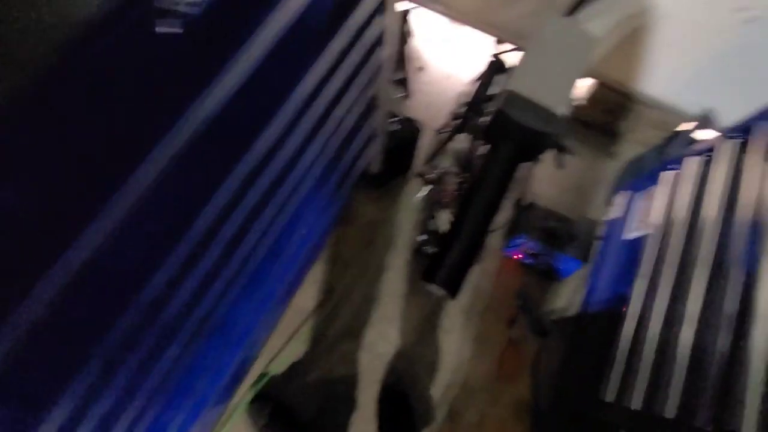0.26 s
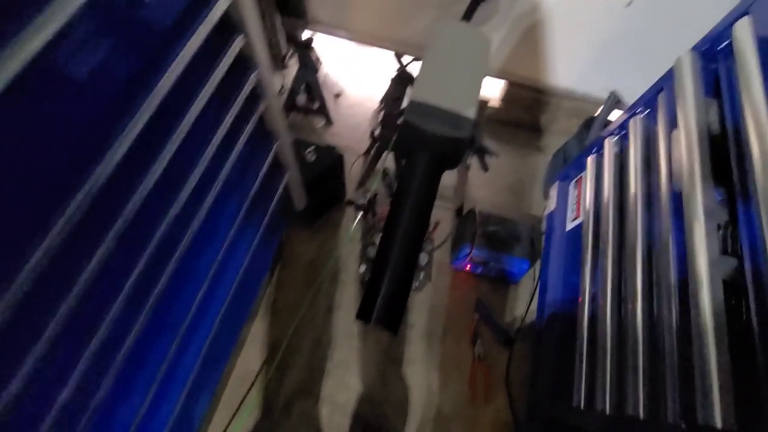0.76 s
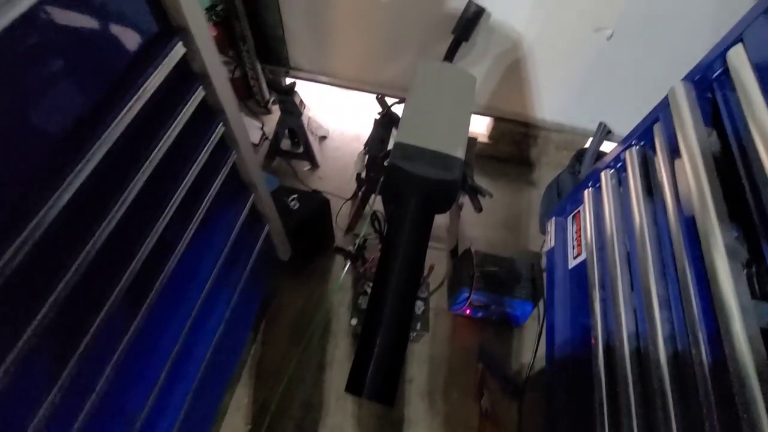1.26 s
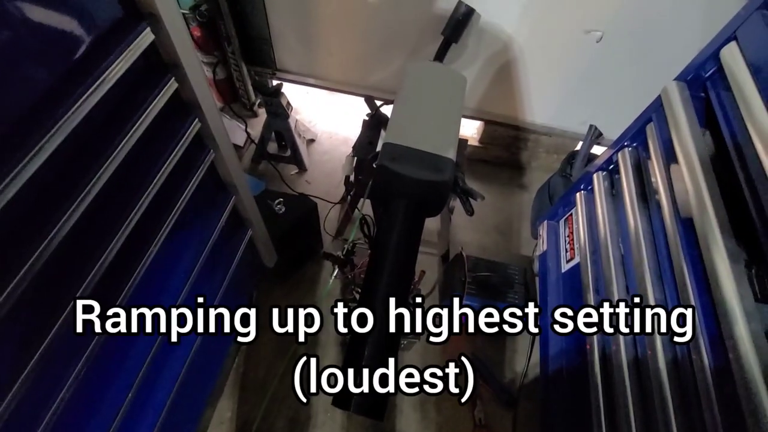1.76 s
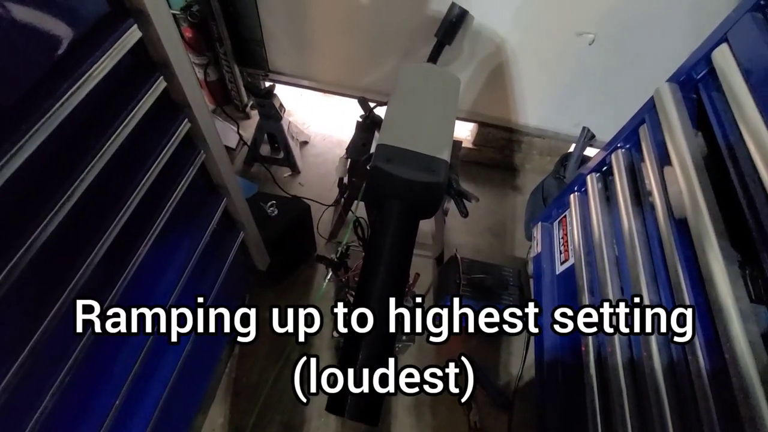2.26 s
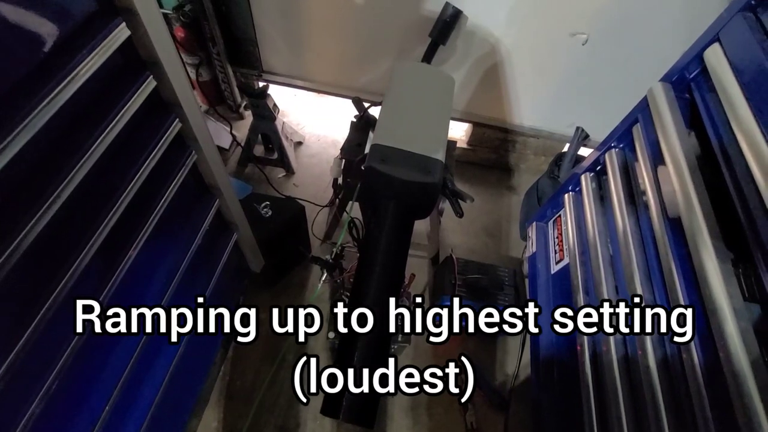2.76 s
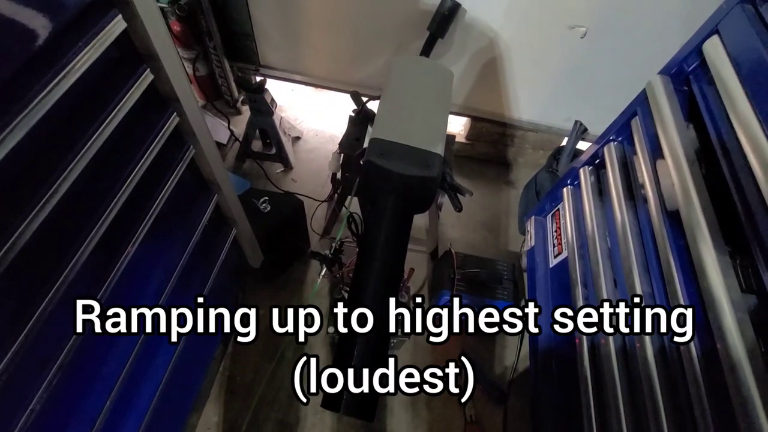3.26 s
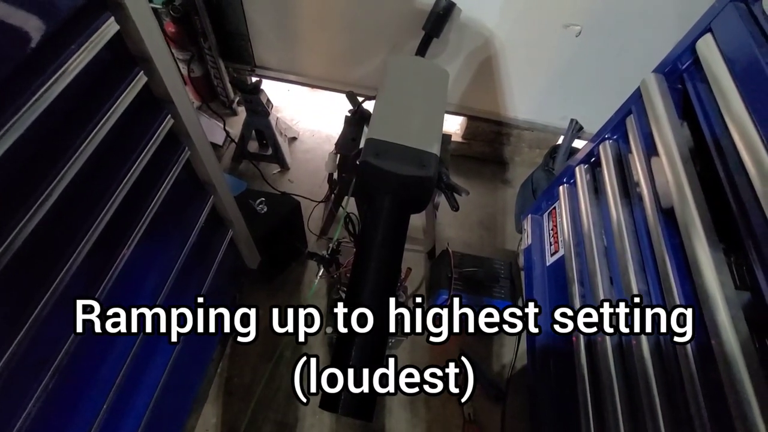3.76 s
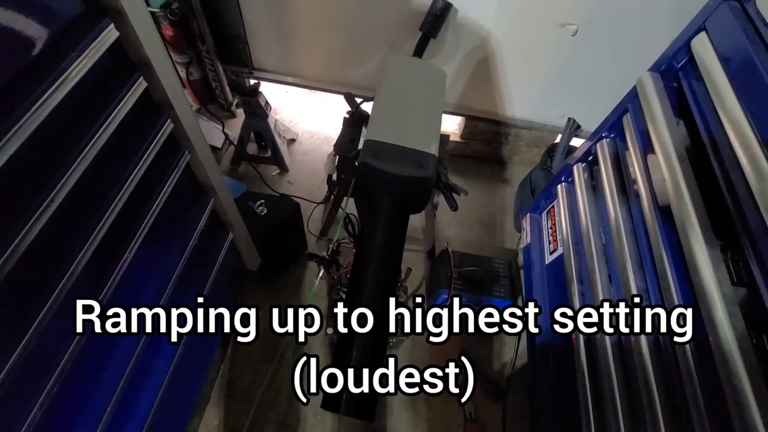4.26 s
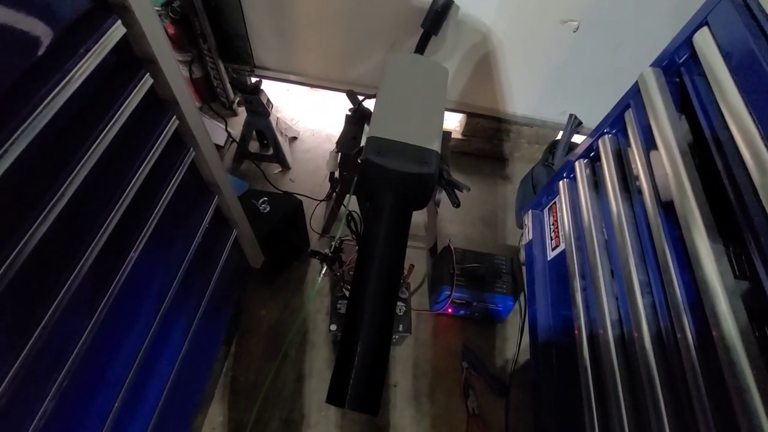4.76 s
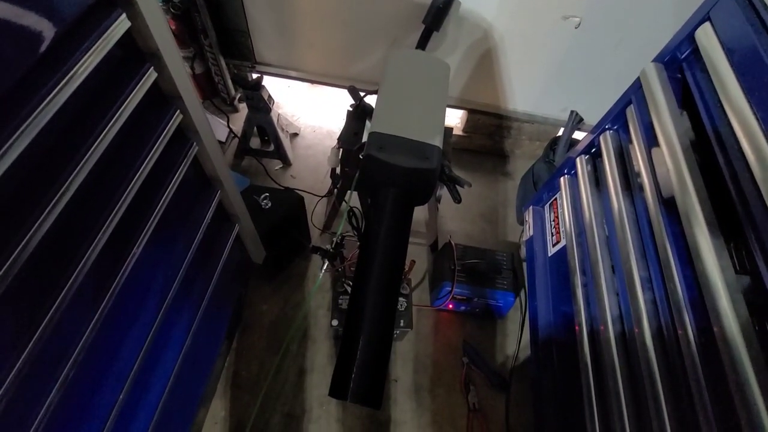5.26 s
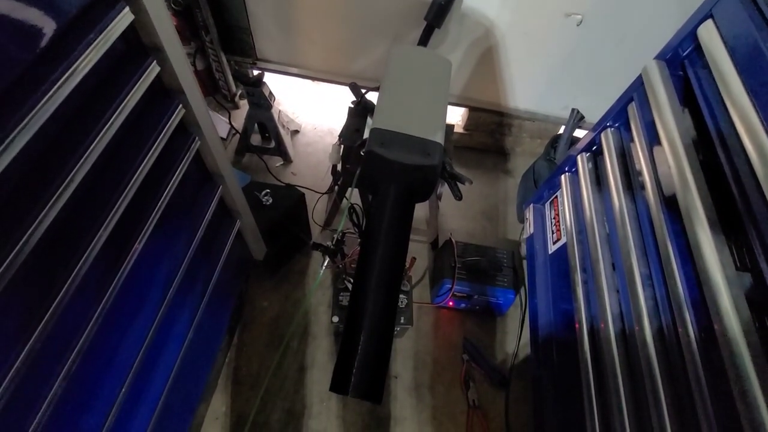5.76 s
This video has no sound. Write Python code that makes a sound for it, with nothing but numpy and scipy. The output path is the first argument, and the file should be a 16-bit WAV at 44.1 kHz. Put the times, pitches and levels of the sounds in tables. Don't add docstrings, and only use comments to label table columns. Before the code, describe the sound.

A diesel air heater is already running in a garage, heard for about six seconds through a handheld stereo camera. Its combustion makes a continuous low, breathy roar, strongest in the bass, with dull pipe resonances and soft air hiss, growing very slightly louder. Over it a wavering, slightly rough blower whine around 900 Hz climbs smoothly by about a semitone, leaning right as the camera settles. At about 0.05 seconds a hard, dry, very close finger snap hits the camera case, with tiny clicks around it and fainter ones near 0.2 and 0.4 to 0.55. Throughout, a fuel pump gives faint, crisp ticks about every 0.35 seconds, each with a softer return tick just after. Around 1 second the turn uncovers a narrow, airy duct whistle near 2.2 kHz. Barely audible cloth brushes pass near 0.5, 1.8 and 2.4; extremely faint, very high electrical whistles enter after 2. The heater continues to the end.

```python
import sys
import numpy as np
from scipy import signal
from scipy.fft import rfft, irfft
from scipy.io import wavfile
from scipy.ndimage import uniform_filter1d

SR = 44100
rng = np.random.default_rng(int(sys.argv[2]) if len(sys.argv) > 2 else 0)


def store_wav(level_fs):
    pcm = np.round(np.clip(np.atleast_2d(level_fs), -1, 1) * 32767)
    wavfile.write(sys.argv[1], SR, pcm.T.astype(np.int16))


def ratio(d):
    e = np.asarray(d, float) / 20
    return 10 ** e


N = 264600
CONTROL = 441


def evened(x):
    return x / np.sqrt(np.mean(x ** 2) + 1e-20)


def read(points, hz):
    f, value = np.transpose(points)
    return np.interp(np.log(hz + 1), np.log(f + 1), value)


def add(mix, s, sound):
    part = mix[:, round(s * SR):][:, :sound.shape[1]]
    part += sound[:, :part.shape[1]]


def coloured(points, shape):
    hz = np.fft.rfftfreq(shape[-1], 1 / SR)
    spectrum = rfft(rng.standard_normal(shape)) * ratio(read(points, hz))
    return evened(irfft(spectrum, shape[-1]))


def drift(per_s, t):
    rates = np.geomspace(.2, per_s, num=24)
    return evened(sum(np.sin(2 * np.pi * (f * t + rng.random())) / np.sqrt(f) for f in rates))


def resonance(hz, centre, width, db):
    return ratio(db) ** 2 / (1 + (2 * (hz - centre) / width) ** 2) ** 2


def roar(patchy_db=1.0, swell_db=.5, ripple_db=2.0, direct=0.48):
    # frequency in Hz, level in dB.
    wash = [(15, -38), (35, -19.5), (75, -4), (140, -14), (300, -13), (500, -17), (620, -23), (1300, -23),
            (1650, -30), (2500, -33), (3600, -42), (5200, -51.5), (8800, -57), (16000, -55.5)]
    # frequency in Hz, width in Hz, height over the wash in dB.
    pipe = [(76.5, 22.4, 9.5), (240.3, 97, 9), (444.5, 79, 9.5), (750, 41, -2.5), (561, 32, 5),
            (1223, 60, 6.5), (1268, 33.4, 14), (1930, 350, 4.5), (2443, 350, 1), (3500, 420, 2),
            (6570, 1800, 9.5), (15300, 900, 8)]
    # frequency in Hz, width in Hz, height over the wash in dB.
    duct = (2225, 57.4, 17.4)
    # frequency in Hz, left-right likeness from -1 to 1.
    likeness = [(60, 0.96), (130, 1), (290, 0.98), (640, 0.88), (1410, -0.011), (3100, -0.16),
                (6820, -0.0031), (15000, -0.39)]
    # frequency in Hz, left over right in dB.
    ear_lean = [(60, -0.5), (110, -1), (200, -0.5), (380, 0), (700, 1.5), (1290, -0.5), (2380, -4),
                (4400, 7), (8120, 1), (15000, 5.5)]
    size, hop = 4096, 1024
    frames = N // hop + 5
    hz = np.fft.rfftfreq(size, 1 / SR)[:, None]
    t = np.arange(frames) * hop / SR
    level_db = -36.5 + 0.2337 * t
    hiss_db = 1 - .5 * t

    hidden_db, open_db, faced_s, turn_s = -12, 0, 1.05, .05
    duct_db = hidden_db + (open_db - hidden_db) * (1 + np.tanh((t - faced_s) / turn_s)) / 2
    duct_db = duct_db + 0.5 * drift(9.9, t)
    modes = sum(resonance(hz, *mode) for mode in pipe)
    lift = np.sqrt(1 + modes + resonance(hz, duct[0], duct[1], duct[2] + duct_db))

    a, b, c, d, patches = rng.standard_normal((frames, len(hz), 5)).T
    patches = uniform_filter1d(patches, size=30, axis=0)
    patches = evened(uniform_filter1d(patches, size=4, axis=1))
    airy = 1 / (1 + (3000 / (hz + 1)) ** 2)

    walls = rng.standard_normal((3, len(hz), 1))
    for _ in range(2):
        walls = uniform_filter1d(walls, size=5, axis=1)
    walls = evened(walls)
    left = a + 1j * b
    echoed = np.clip(direct, 0, 1) * np.sqrt(1 - 1 / lift ** 2 / 2)
    apart = echoed * np.exp(2j * walls[2]) * left + np.sqrt(1 - echoed ** 2) * (c + 1j * d)
    same = np.clip(read(likeness, hz), -1, 1)
    z = np.array([left, same * left + np.sqrt(1 - same ** 2) * apart])

    ear_db = read(ear_lean, hz) / 2 * np.array([1, -1])[:, None, None]
    ear_db = ear_db + ripple_db * walls[:2] * (hz > 480)
    z *= lift * ratio(read(wash, hz) + ear_db + airy * hiss_db + patchy_db * patches + swell_db * drift(3, t))
    flow = signal.istft(z, nperseg=size, noverlap=size - hop)[1][:, :N]
    return evened(flow) * ratio(np.interp(np.arange(N) / SR, t, level_db))


def blower(waver_db=2.0, wobble_hz=1.1):
    # time in seconds, level in dB.
    blade_level = [
        (0, -54.5),
        (.33, -61),
        (.5, -54.5),
        (1.3, -55),
        (2.2, -58.5),
        (3, -55),
        (4, -56.5),
        (4.5, -55.5),
        (6, -55.5),
    ]
    # order, level against the blade tone in dB at left, the same at right.
    shaft = [(9, -1.5, -1.5), (15, -7, -17), (17, -15, -12), (20, -3, -23.5), (21.336, 0, 1),
             (22.43, -23.5, -7), (23, -33, -37), (25, -13, -8), (30, -25, -14), (43, -28, -30),
             (294, -31, -36), (336, -36, -44), (350, -46, -44)]
    blades, blade_hz, climb_hz_per_s = 21, 890, 9.15
    t = np.arange(N) / SR
    slow = t[::CONTROL]
    level_db = np.interp(slow, *np.transpose(blade_level))
    lean_start_db, lean_end_db, lean_s = 0, -7.5, 1
    lean_db = lean_end_db + (lean_start_db - lean_end_db) * np.exp(-slow / lean_s)
    hz = blade_hz + climb_hz_per_s * t + wobble_hz * np.interp(t, slow, drift(2.036, slow))
    turns = np.cumsum(hz) / blades / SR
    out = np.zeros((2, N))
    for order, *under_db in shaft:
        tone = np.sqrt(2) * np.sin(2 * np.pi * (np.round(order) * turns + rng.random()))
        for ear in range(2):
            db = level_db + (.5 - ear) * lean_db + under_db[ear] + waver_db * drift(5, slow)
            out[ear] += tone * np.interp(t, slow, ratio(db))
    return out


def blows():
    # stroke peak in dB, return peak in dB.
    strokes = [(-30, -37), (-33, -38), (-31.5, -36.5), (-31, -40), (-32, -41), (-30.5, -37.5), (-32, -37),
               (-32, -39.5), (-32, -38.5), (-31.5, -38.5), (-30.5, -38.5), (-30.5, -41), (-30.5, -37),
               (-32.5, -41.5), (-32.5, -36), (-33, -43), (-33.5, -42.5)]
    first_s, slow_s, fast_s, slow_strokes, return_s = .1443, .3563, .3433, 5, .0534
    k = np.arange(len(strokes))
    s = first_s + slow_s * np.minimum(k, slow_strokes) + fast_s * np.maximum(k - slow_strokes, 0)
    thud_db = -8.5 + 3 * rng.uniform(-1, 1, (len(k), 2))
    for at, (stroke_db, return_db), thud in zip(s, strokes, thud_db):
        yield at, stroke_db, 3, thud[0]
        yield at + return_s, return_db, 0.5, thud[1]


def pump(blow_s=0.0031, ring_s=0.012, ring_db=-12, late_s=0.064, late_db=-22, crest_db=-4, strike_db=-4.5,
         alike=.4, lead_s=.004, scrape_s=.0018):
    # frequency in Hz, level in dB.
    blow_colour = [(1500, -30), (2900, -20), (3250, -8), (3700, -18), (5000, -10.5), (5900, 3.5),
                   (6900, 5.5), (8000, -12), (11000, -16), (15700, -20)]
    # frequency in Hz, level in dB.
    ring_colour = [(2500, -12), (3300, -10.5), (4600, -15.5), (5500, -7.5), (6000, 0), (7000, -4.5),
                   (7800, -11), (9000, -23), (15500, -20.5)]
    thud_hz, thud_s = 3290, 0.0057
    t = np.arange(8192) / SR
    out = np.zeros((2, N))
    onset = np.clip(t / lead_s, 0, 1) ** 2
    blow_shape = ratio(strike_db) * np.exp(-abs(t - lead_s) / np.where(t < lead_s, scrape_s, blow_s))
    ring_shape = (ratio(ring_db) * np.exp(-t / ring_s) + ratio(late_db) * np.exp(-t / late_s)) * onset

    def rattle():
        blow = coloured(blow_colour, (2, len(t))) * blow_shape
        return blow + coloured(ring_colour, (2, len(t))) * ring_shape

    usual = rattle()
    alike = np.clip(alike, 0, 1)
    for s, peak_db, lean_db, thud_db in blows():
        tick = alike * usual + np.sqrt(1 - alike ** 2) * rattle()
        turn = thud_hz * rng.uniform(0.97, 1.02) * t + rng.random((2, 1))
        tick += ratio(thud_db) * np.sin(2 * np.pi * turn) * np.exp(-t / thud_s) * onset
        ear_db = lean_db * np.array([[.5], [-.5]])
        add(out, s - lead_s / 2, tick * ratio(peak_db + crest_db + ear_db))
    return out


def fingers(buzz_db=-37, buzz_s=.007):
    # start in seconds, peak in dB at left, peak in dB at right,
    # case knock in Hz, length in ms.
    clicks = [(.0348, -50, -30, 2500, 1.5), (.0378, -50, -30, 2500, 2), (.045, -42, -30, 3500, 2),
              (.0485, -17, -.8, 2500, .55), (.0515, -22, -28, 1500, 1.5), (.0605, -36, -17, 2700, 1.1),
              (.0621, -7, -20, 2400, .6), (.0631, -14, -20, 1000, 1.0), (.2128, -42, -44, 2500, .8),
              (.249, -56, -49, 4500, 2.5), (.4315, -34, -30, 2000, .5), (.4925, -39, -37, 900, 1.5),
              (.5145, -47, -40, 3500, 3), (.5264, -30, -20, 1600, .5)]
    # centre in seconds, level in dB, length in seconds.
    rustles = [
        (0.511, -52, 0.016),
        (1.826, -60, 0.063),
        (2.434, -61.5, 0.056),
    ]
    # frequency in Hz, level in dB.
    cloth = [(1500, -14), (4000, 0), (6500, 3), (9000, -12), (15500, -11)]
    case_share = .6
    lead = 128
    t = np.maximum(np.arange(-lead, 1920) / SR, 0)
    out = np.zeros((2, N))
    band_hz = np.fft.rfftfreq(len(t), 1 / SR)
    for s, left_db, right_db, hz, ms in clicks:
        port_db = -8 + 9 * np.log2(hz / 2300)
        colour = [(150, -30), (hz / 2, -5), (hz, 0), (5000, port_db - 2.5), (6500, port_db),
                  (8500, port_db - 12.5), (12500, port_db - 22), (16000, port_db - 28)]
        u = t * 2500 / ms
        envelope = u * np.exp(1 - u) + (t > 0) * ratio(buzz_db) * np.exp(-t / buzz_s)
        near, far = rng.standard_normal((2, len(t)))
        pair = np.array([near, case_share * near + np.sqrt(1 - case_share ** 2) * far])
        burst = rfft(pair * envelope)
        even = burst / np.sqrt(uniform_filter1d(abs(burst) ** 2, size=70, axis=1) + 1e-12)
        snap = irfft(even * ratio(read(colour, band_hz)), len(t))
        snap = snap / abs(snap).max(1, keepdims=True)
        add(out, s - lead / SR, snap * ratio(np.array([[left_db], [right_db]])))
    t = np.arange(-4096, 4096) / SR
    for s, db, length in rustles:
        add(out, s + t[0], ratio(db) * np.exp(-(t / length) ** 2) * coloured(cloth, (2, len(t))))
    return out


def controller():
    # frequency in Hz, level in dB at left, level in dB at right, start in seconds.
    whistles = [
        (15138, -90, -96, 4.3),
        (15633, -86, -96, 2),
        (15420, -94, -96, 5),
    ]
    t = np.arange(N) / SR
    slow = t[::CONTROL]
    out = np.zeros((2, N))
    for hz, left_db, right_db, s in whistles:
        flutter = np.interp(t, slow, ratio(3.0 * drift(7.4, slow)))
        tone = np.sin(2 * np.pi * hz * t) * np.clip((t - s) / .2, 0, 1) * flutter
        out += tone * ratio(np.array([[left_db], [right_db]]))
    return out


def scene():
    return roar() + blower() + pump() + fingers() + controller()


def top_cut(x):
    return signal.sosfilt(signal.butter(12, 16760, fs=SR, output="sos"), x)


def record(dry):
    edge = signal.firwin(767, 15700, window=("kaiser", 8), fs=SR)[None]
    mix = signal.oaconvolve(dry, edge, "same")
    return top_cut(mix)


dry = scene()
out = record(dry)
store_wav(out)
```